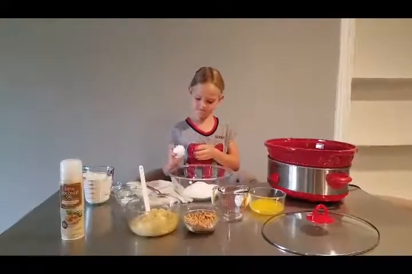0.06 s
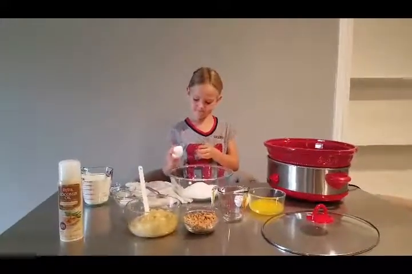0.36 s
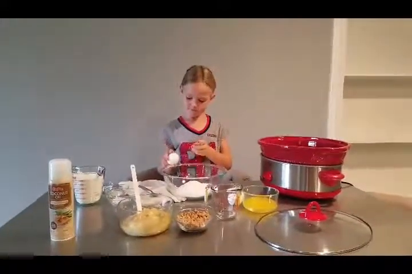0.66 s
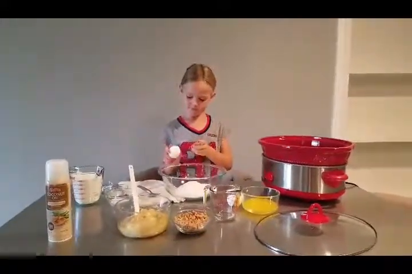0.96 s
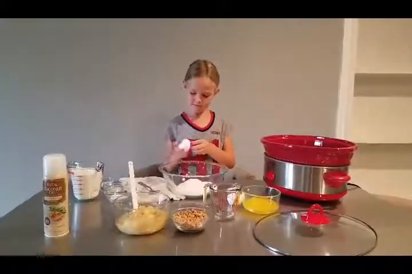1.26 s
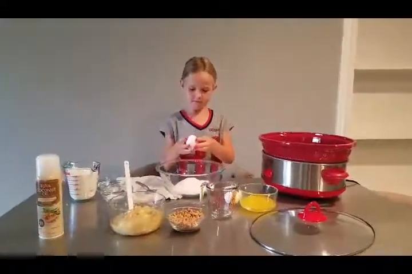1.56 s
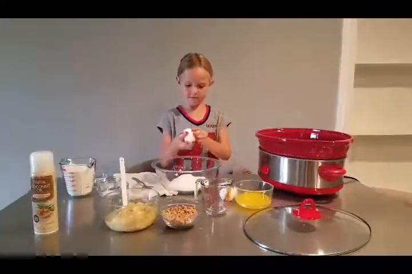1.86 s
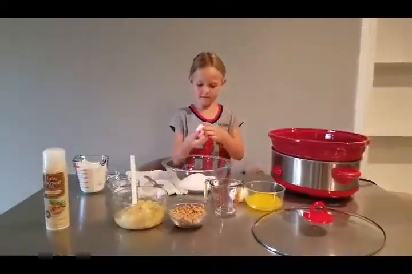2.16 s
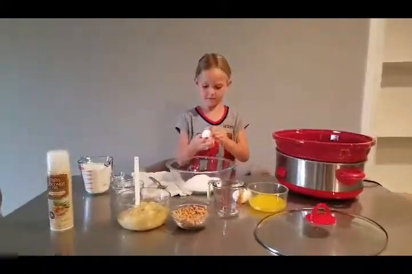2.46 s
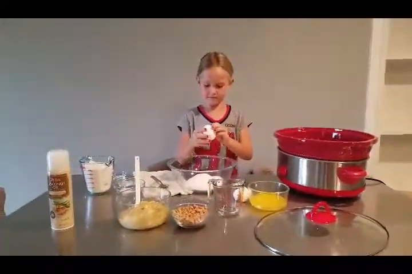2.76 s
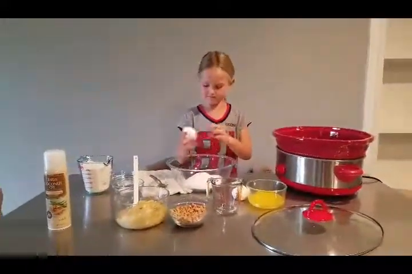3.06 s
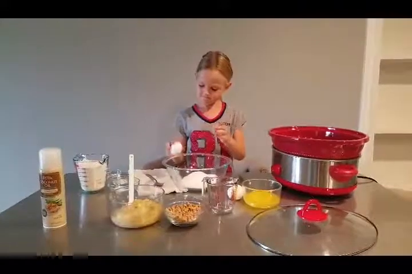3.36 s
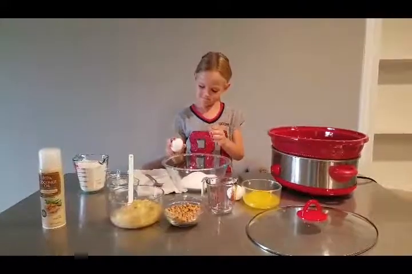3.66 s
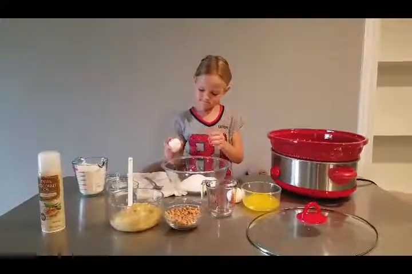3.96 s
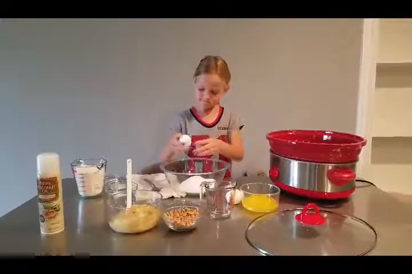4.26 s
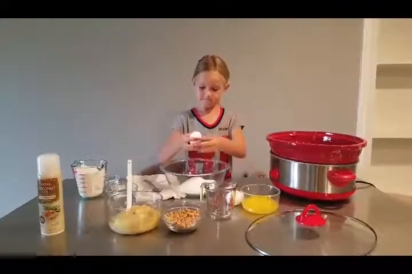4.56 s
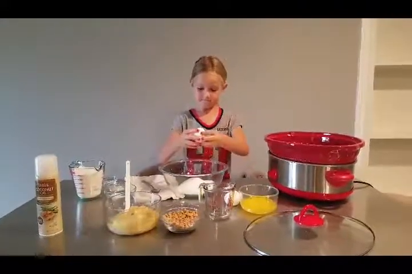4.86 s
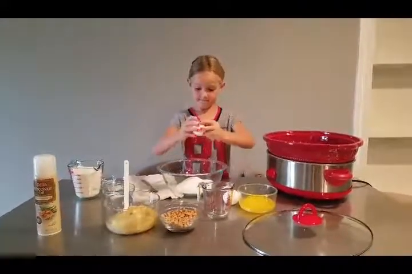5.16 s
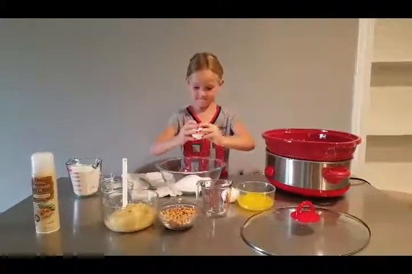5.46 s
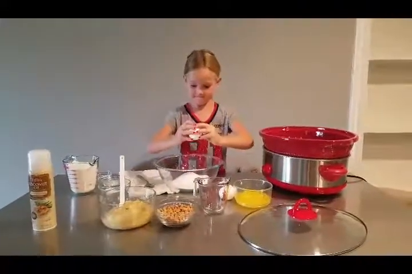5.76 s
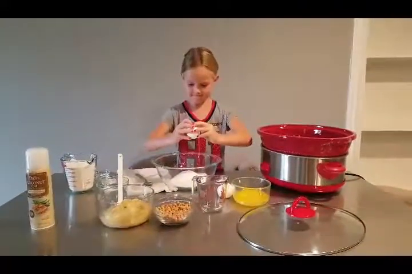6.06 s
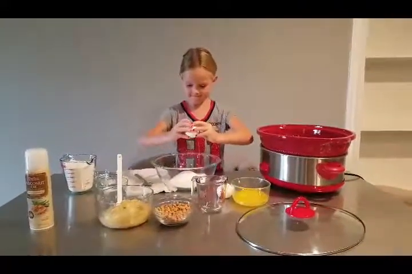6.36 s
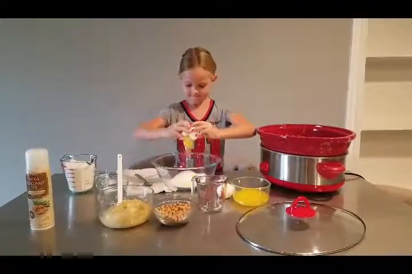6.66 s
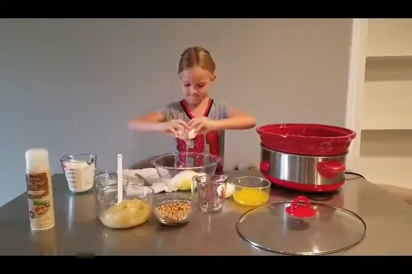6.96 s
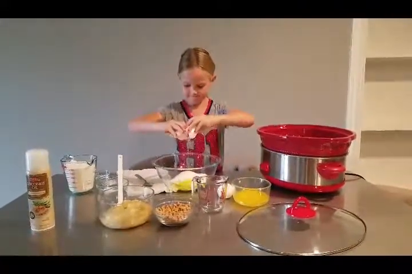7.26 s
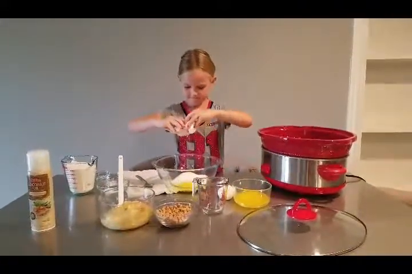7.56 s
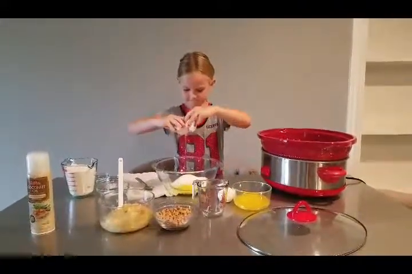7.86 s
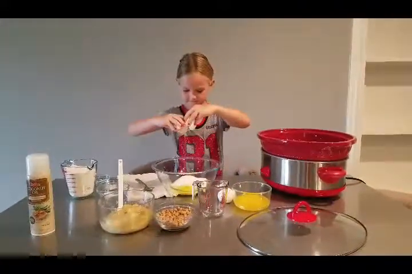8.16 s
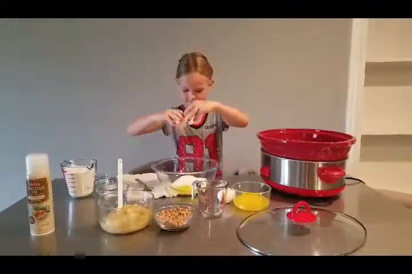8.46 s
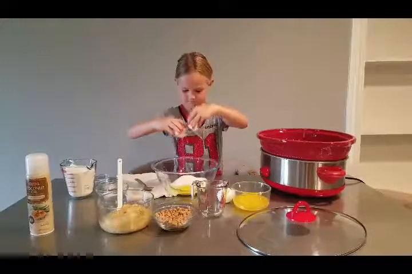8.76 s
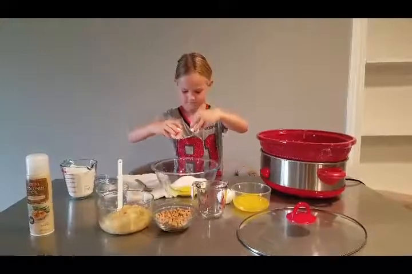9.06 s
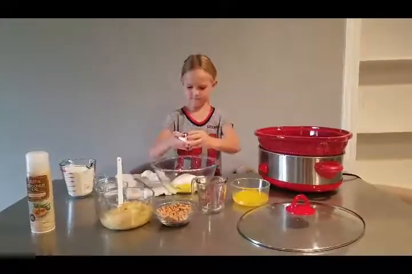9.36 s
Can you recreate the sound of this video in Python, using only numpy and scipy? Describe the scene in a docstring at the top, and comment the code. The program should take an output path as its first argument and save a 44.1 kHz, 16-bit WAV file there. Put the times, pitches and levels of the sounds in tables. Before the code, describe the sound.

In a quiet, slightly echoing room with a low appliance hum, an egg knocks against a glass bowl three times, then twice more, each tap leaving a short ring. Close handling clicks and rubs on the microphone come in between. Small ticks build into brittle snapping as the eggshell is pulled open, the contents plop softly, and the emptied halves crackle lightly as they are shaken.

```python
"""An appliance hums in a bare, quiet room; fingers click and slide on a hand-held camera.
An egg is tapped on the rim of a glass bowl, three times, then twice more: the shell cracks, the glass rings.
Thumbs press into the dent and the shell splits with a run of snaps.
The egg drops out with a plop; the wet, hollow halves are worked and shaken."""
import sys
import numpy as np
from scipy import signal
from scipy.fft import rfft, irfft
from scipy.io import wavfile

SR = 44100
rng = np.random.default_rng(int(sys.argv[2]) if len(sys.argv) > 2 else 0)


def inscribe(sig):
    """Save sig as 16-bit PCM at rate SR to the path in sys.argv[1].

    A 1-D sig is mono; a 2-D sig holds one channel per row.
    Samples are clipped to [-1, 1] before scaling.
    """
    pcm = np.round(np.clip(np.atleast_2d(sig).T, -1, 1) * 32767)
    wavfile.write(sys.argv[1], SR, pcm.astype(np.int16))


N = 414981

# egg on the rim: start_s, crack_db, treble_db, knock_db, knock_hz, crush_db
TAPS = [(0.5066, -29.5, -36, -31, 810, -31.5), (0.719, -33, -41.5, -39.5, 540, -70),
        (0.9175, -32.5, -37.5, -35.5, 740, -72), (3.3775, -31, -32, -34.5, 513, -36),
        (3.583, -40, -38.5, -42, 640, -65)]
# spectra of the shell's body and of a running crack: freq_hz, gain_db
SHELL = [(100, -29), (450, -23), (900, -17), (1450, -5), (2000, -5), (2800, 0), (3400, -0.5), (4100, -3),
         (5100, -3), (7000, -7), (9000, -15.5), (14000, -45)]
SPLINTER = [(2000, -32.5), (5500, -3.5), (7500, -1), (9500, -7.5), (11500, -2), (14400, 1), (16000, -5.5)]
# thumb squeezes: start_s, length_s, crumble_db, chip_db
SQUEEZES = [(5.469, 0.1, -64.5, -54), (6.21, .16, -67, -61), (6.378, 0.19, -53.5, -48.5),
            (6.59, .21, -59, -60), (6.947, 0.1, -58, -62), (7.313, 0.11, -72, -61),
            (7.608, 0.25, -66.5, -61.5), (8.499, 0.086, -56.5, -56), (8.681, 0.16, -62, -61.5)]
SPLIT_S, SPLIT_LENGTH_S = 6.41, 0.061


def amp(db):
    """Decibels to gain."""
    return 10 ** (np.asarray(db) / 20)


def unit(x):
    """Scale to rms 1."""
    return x / np.sqrt(np.mean(x ** 2) + 1e-20)


def read(points, hz):
    """Interpolate a table over log frequency."""
    freq_hz, value = np.transpose(points)
    return np.interp(np.log(hz + 1), np.log(freq_hz), value)


def add(mix, start_s, sound):
    """Mix a sound in at start_s."""
    part = mix[:, round(start_s * SR):][:, :sound.shape[-1]]
    part += sound[:, :part.shape[1]]


def pan(left_db):
    """Stereo gains for a left-over-right level."""
    return amp([[left_db / 2], [-left_db / 2]])


def sized(click, level_db, window_s=.004):
    """Give a click the energy of level_db held for window_s."""
    return amp(level_db) * unit(click) * np.sqrt(window_s * SR / click.shape[1])


def arches(strokes, peak_share, exponent):
    """Envelope: each stroke swells and lets go."""
    gain = np.zeros((1, N))
    for start_s, length_s, level_db, *_ in strokes:
        progress = np.linspace(0, 1, round(length_s * SR))
        skewed = np.interp(progress, [0, peak_share, 1], [0, .5, 1])
        add(gain, start_s, amp(level_db) * abs(np.sin(np.pi * skewed[None])) ** exponent)
    return gain


def colour(x, spectrum, peak_hz=1000, peak_db=0, width_share=.2, size=2048):
    """Minimum-phase filter: a spectrum plus one resonance."""
    hz = np.fft.rfftfreq(size, 1 / SR)
    gain_db = read(spectrum, hz) + peak_db / (1 + ((hz / peak_hz - 1) / width_share) ** 2)
    cepstrum = irfft(np.log(amp(gain_db)))
    cepstrum[1:size // 2] *= 2
    cepstrum[size // 2 + 1:] = 0
    impulse = irfft(np.exp(rfft(cepstrum)))
    return signal.fftconvolve(x, impulse[None], axes=1)[:, :x.shape[1]]


def noise_pair(spectrum, correlation, size):
    """Coloured stereo noise, left-right correlation set by frequency."""
    hz = np.fft.rfftfreq(size, 1 / SR)
    left, other = rfft(rng.standard_normal((2, size)))
    same = read(correlation, hz)
    right = same * left + np.sqrt(1 - same ** 2) * other
    return irfft(np.array([left, right]) * amp(read(spectrum, hz)), size)


def grains(rate_per_s, spread_db, size):
    """Sparse tiny clicks of uneven size."""
    heights = amp(spread_db * np.minimum(rng.exponential(1, size), 3)) * rng.choice([-1, 1], size)
    return unit(heights * (rng.random(size) < rate_per_s / SR))


def burst(decay_s, ragged, stereo, size=2048):
    """A sudden release, then fast-dying chatter."""
    t = np.arange(size) / SR
    noise = rng.standard_normal(size) + stereo * rng.standard_normal((2, size))
    chatter = unit(noise * np.exp(-t / decay_s)) / np.sqrt(size)
    return (t == 0) + ragged * chatter


def background(air_db=-67):
    """Still air and a steady appliance hum."""
    # hum partials: pitch_hz, level_db
    partials = [(74, -86), (90, -76), (101, -86.5), (116, -90), (127, -88.5), (139.5, -80.5), (187, -85.5),
                (278, -86), (545, -109.5)]
    # air noise: freq_hz, gain_db
    air = [(20, 2), (60, -7.5), (120, -1), (240, -5), (350, -1), (550, -2.5), (900, -6.5), (1800, -7.5),
           (4000, -13.5), (7000, -17.5), (9500, -19), (13900, -13), (16000, -30)]
    # left-right likeness: freq_hz, correlation
    air_likeness = [(60, 0.66), (180, 0.46), (550, 0.073), (1650, 0.06), (4970, 0.017), (15000, 0.02)]
    t, knots_s = np.arange(N) / SR, np.linspace(0, N / SR, num=30)
    hum = np.zeros(N)
    for pitch_hz, level_db in partials:
        drift_rad = .5 * np.interp(t, knots_s, rng.standard_normal(len(knots_s)))
        hum += amp(level_db) * np.sqrt(2) * np.sin(2 * np.pi * (pitch_hz * t + rng.random()) + drift_rad)
    return amp(air_db) * unit(noise_pair(air, air_likeness, N)) + hum


def handling():
    """Fingers slide near the left port, click and bump; the camera's case carries the sound."""
    # finger touches: start_s, click_db, bump_db, left_db
    touches = [(0.158, -73, -58.5, 1), (.2122, -56, -69, 16), (0.3286, -55, -48, 35),
               (1.3457, -40.5, -69, 27), (1.501, -57, -40, 15), (2.0406, -83, -43.5, -16),
               (2.138, -43.5, -56, 25), (2.152, -44.5, -40, -15), (2.1579, -36.5, -36.5, 8),
               (3.81, -53.5, -60, 25), (9.069, -70, -60, -18), (9.2049, -62.5, -54.5, -26)]
    # finger slides: start_s, length_s, level_db
    slides = [(.322, 0.039, -66), (1.22, .22, -74), (1.4, 0.15, -63), (1.685, 0.14, -59.5),
              (1.825, 0.085, -62), (2.075, 0.048, -72), (2.135, 0.069, -66.5)]
    # spectra: freq_hz, gain_db
    skin = [(100, -29), (700, -11.5), (1300, -1.5), (2200, 0.5), (3200, -7.5), (4500, -14), (8000, -10.5),
            (9700, -25), (11500, -17.5), (15000, -17.5)]
    case_click = [(100, -24), (700, -13.5), (1300, 5.5), (2200, 6), (3200, 0), (4500, -14), (8000, -10.5),
                  (10000, -27), (15000, -13)]
    case_bump = [(30, -19), (120, -4.5), (400, 6), (800, -1.5), (1500, 2.5), (5000, -25.5)]
    rub = grains(5000, 0.55, N) + 0.35 * rng.standard_normal((2, N))
    out = arches(slides, peak_share=0.6, exponent=0.85) * unit(colour(rub, skin)) * pan(23.8)
    for start_s, click_db, bump_db, left_db in touches:
        click = colour(burst(decay_s=0.00017, ragged=0.99, stereo=1), case_click)
        bump = colour(burst(decay_s=0.0023, ragged=0.3, stereo=0.08), case_bump)
        add(out, start_s, unit(pan(left_db)) * (sized(click, click_db) + sized(bump, bump_db)))
    return out


def splinter(rise_s, decay_s, stereo, size=2048):
    """A crack runs through the shell: a brief fizz."""
    t = np.arange(size) / SR
    fizz = rng.standard_normal(size) + stereo * rng.standard_normal((2, size))
    return colour(fizz * (1 - np.exp(-t / rise_s)) * np.exp(-t / decay_s), SPLINTER)


def crumbs(rate_per_s, treble_db, size):
    """Many tiny breaks, each sounding the shell."""
    onsets = grains(rate_per_s, 1, size)[None]
    breaks = signal.fftconvolve(onsets, burst(decay_s=0.0014, ragged=0.6, stereo=1), axes=1)[:, :size]
    return unit(unit(colour(breaks, SHELL)) + amp(treble_db) * unit(colour(breaks, SPLINTER)))


def taps():
    """Each blow cracks the shell, knocks the bowl on the table and crushes a small dent."""
    out, t = np.zeros((2, N)), np.arange(SR // 5) / SR
    for start_s, crack_db, treble_db, knock_db, knock_hz, crush_db in TAPS:
        crack = colour(burst(decay_s=0.0042, ragged=1.86, stereo=1), SHELL)
        fizz = splinter(rise_s=0.0002, decay_s=0.0008, stereo=1.3)
        add(out, start_s, sized(crack, crack_db) + sized(fizz, treble_db))
        add(out, start_s, sized(knock(knock_hz), knock_db + 1.5))
        dent = crumbs(1700, treble_db - crack_db, len(t)) * np.exp(-t / 0.017)
        add(out, start_s, amp(crush_db) * dent)
    return out


def knock(pitch_hz):
    """The bowl on the table: a thud with one resonance."""
    # thud spectrum: freq_hz, gain_db
    thud = [(30, -28), (90, -9), (140, -12), (230, -17), (300, -7), (370, -8.5), (480, -3), (750, 3),
            (1100, -5), (2000, -22.5), (6000, -70)]
    blow = burst(decay_s=0.0024, ragged=0.92, stereo=0.08)
    return colour(blow, thud, peak_hz=pitch_hz, peak_db=9, width_share=.17)


def bowl(twin_lag_rad=1.45):
    """Twin glass modes beat as they die; the egg's next touch damps the ring."""
    # glass modes: pitch_hz, twin_offset_hz, twin_gain, t60_s, left_db
    modes = [(508, 9, .5, .5, -2), (1365, 9.8, 1, .56, -2), (2531, 15, .7, .41, 4), (3962, -12, .6, .29, 0),
             (5527, -22, .5, .27, -2), (7190, 20, .5, .24, 0), (10805, -25, .5, .19, 0),
             (13062, -20, .5, .17, 0)]
    # spot struck, per tap: mode1_db, mode2_db, mode3_db, mode4_db, mode5_db, higher_db
    spots = [(-67, -49.5, -30, -36, -51, -51), (-49.5, -33.5, -39, -35.5, -38, -58),
             (-50, -35, -32.5, -49, -74, -49), (-61, -27.5, -40.5, -42, -62, -56),
             (-58.5, -41.5, -48.5, -40, -48, -67)]
    # twin excitation, per tap: lowest_two_share, others_share
    twins = [(.3, .2), (.85, .3), (1, .25), (.12, .9), (.25, .6)]
    out, t = np.zeros((2, N)), np.arange(SR) / SR
    swell = 1 - .5 * np.exp(-t / 0.0033)
    starts_s = [tap[0] for tap in TAPS]
    nexts_s = starts_s[1:] + [np.inf]
    for start_s, next_s, mode_db, (low_share, high_share) in zip(starts_s, nexts_s, spots, twins):
        damping = np.where(start_s + t < next_s, 1, .6)
        for k, (pitch_hz, offset_hz, twin_gain, t60_s, left_db) in enumerate(modes):
            share = low_share if k < 2 else high_share
            twin = np.sin(2 * np.pi * (pitch_hz + offset_hz) * t - twin_lag_rad)
            pair = np.sin(2 * np.pi * pitch_hz * t) + share * twin_gain * twin
            envelope = swell * damping * np.exp(-np.log(1000) * t / t60_s)
            add(out, start_s, pan(left_db) * amp(mode_db[min(k, 5)]) * pair * envelope)
    return out


def room(x, size=32768):
    """Dense tail from bare walls; treble dies first."""
    # tail spectrum: freq_hz, gain_db
    walls = [(60, -0.5), (250, 5.5), (600, -3), (1400, 3), (3000, -1.5), (6000, -0.5), (10000, 3),
             (14500, 3)]
    # tail decay: freq_hz, t60_s
    decay = [(150, 0.77), (600, 0.52), (1500, 0.45), (4000, .46), (8000, 0.44), (14500, 0.3)]
    # left-right likeness: freq_hz, correlation
    likeness = [(100, 0.95), (500, 0.75), (1200, 0.29), (2500, 0), (15000, 0)]
    hz, frame_s, bands = signal.stft(noise_pair(walls, likeness, size), SR, nperseg=256)
    fade = np.exp(-np.log(1000) * frame_s / read(decay, hz)[:, None])
    tail = signal.istft(bands * fade, SR, nperseg=256)[1]
    t = np.arange(tail.shape[1]) / SR
    tail *= np.clip(t / 0.0026, 0, 1) * (1 + 1.68 * np.exp(-t / 0.0042))  # table and near wall first
    return signal.fftconvolve(x, tail / np.linalg.norm(tail[0]), axes=1)[:, :N]


def opened(time_s):
    """How far the shell has parted, 0-1."""
    return np.clip((time_s - SPLIT_S) / SPLIT_LENGTH_S + .5, 0, 1)


def snap(start_s, level_db, pitch_hz, treble_db):
    """A fragment rings, the crack fizzes, the egg pops along: faintly once split."""
    release = burst(decay_s=0.0014, ragged=2, stereo=0.86)
    fragment = colour(release, SHELL, peak_hz=pitch_hz, peak_db=11, width_share=.18)
    fizz = splinter(rise_s=0.00028, decay_s=0.001, stereo=1.9)
    pop_db = level_db - 12 - 25 * opened(start_s)
    return sized(fragment, level_db) + sized(fizz, level_db + treble_db) + pop(pop_db)


def pop(level_db):
    """Dull, wet sound of the egg's contents."""
    # pop spectrum: freq_hz, gain_db
    contents = [(40, -23), (200, -28), (400, 1), (600, 8), (850, 2), (1500, -19.5), (5000, -87)]
    return sized(colour(burst(decay_s=0.0065, ragged=0.77, stereo=0.2), contents), level_db)


def chips(count=12, gap_s=0.027, centre_hz=3900, spread_octaves=0.49):
    """Small chips break off at random while a squeeze lasts."""
    out = np.zeros((2, N))
    for start_s, length_s, _, chip_db in SQUEEZES:
        times_s = start_s + gap_s * (np.arange(count) + rng.random(count))
        for time_s, (scatter_db, detune) in zip(times_s, rng.standard_normal((count, 2))):
            pitch_hz = centre_hz * 2 ** (spread_octaves * detune)
            chip = snap(time_s, chip_db - scatter_db, pitch_hz, treble_db=1)
            add(out, time_s, chip * (time_s < start_s + length_s))
    return out


def shell(lead_s=.008):
    """The shell crumbles under the thumbs, snaps and sheds crumbs; the contents plop."""
    # clear snaps: start_s, level_db, pitch_hz, treble_db
    snaps = [(2.465, -58, 6230, -4), (4.9008, -60, 5740, -10), (5.1705, -69, 4930, 10.5),
             (5.3062, -62.5, 6760, 4), (5.326, -51.5, 4930, -0.5), (5.388, -48, 7000, 1.5),
             (5.4353, -54, 6340, 5), (5.4775, -49.5, 6100, 1.5), (5.5676, -52, 5600, 11),
             (5.585, -54, 5300, -1), (5.627, -67, 5250, 12), (5.7266, -47, 5600, 7),
             (5.793, -61.5, 5730, 0), (6.076, -62, 5440, -3), (6.1638, -60, 5670, 5),
             (6.2358, -45.5, 3420, 4.5), (6.313, -64.5, 5600, 12.5), (6.3827, -58, 2970, 11),
             (6.395, -46, 6150, 11), (6.423, -36.5, 5150, 3.5), (6.4309, -32, 3350, -5),
             (6.443, -34.5, 1980, 3.5), (6.4793, -38.5, 2520, -2), (6.532, -36, 2280, -1.5),
             (6.567, -41.5, 5100, 4), (6.6128, -36, 1390, 0.5), (6.673, -33.5, 3360, -7),
             (6.7608, -40, 3520, 0), (6.8, -48, 3560, -1), (6.913, -53.5, 5200, -9), (6.9538, -44, 2900, 9),
             (6.958, -37.5, 3900, 3), (7.0283, -41, 3070, -17), (7.3515, -41.5, 5460, 1),
             (7.383, -39.5, 2880, -2), (7.6524, -46.5, 2770, -5), (7.695, -49.5, 2900, 8),
             (7.8117, -54, 7000, 2), (7.832, -54, 2790, -11), (7.9703, -47.5, 2950, -13),
             (8.1658, -57.5, 3460, 3.5), (8.4923, -56.5, 3750, 3.5), (8.5388, -45, 4760, 0),
             (8.7973, -55, 2460, 3.5), (9.368, -53.5, 5900, -12)]
    # thumbs break in, egg drops, last blob of white follows: start_s, level_db
    plops = [(5.387, -49.5), (6.955, -54), (7.383, -56)]
    crumbling = arches(SQUEEZES, peak_share=0.34, exponent=1) * crumbs(450, -5.5, N)
    out = crumbling + chips()
    t = np.arange(2048)[None] / SR
    flurry = np.exp(-abs(t - lead_s) / 0.0026)  # tiny breaks before and after a snap
    shedding = np.zeros((1, N))
    for start_s, level_db, pitch_hz, treble_db in snaps:
        add(out, start_s, snap(start_s, level_db, pitch_hz, treble_db))
        add(shedding, start_s - lead_s, amp(level_db) * flurry)
    out += amp(-7.5) * shedding * crumbs(3300, -7, N)
    for start_s, level_db in plops:
        add(out, start_s, pop(level_db))
    return out


def hollow(x, start_hz=1800, end_hz=1420, sink_s=0.1, width_hz=140, fade_db_per_s=7.5):
    """Air in the parted halves resonates, sinking and fading as they empty."""
    t = np.arange(N) / SR
    since_s = np.maximum(t - SPLIT_S, 0)
    pitch_hz = end_hz + (start_hz - end_hz) * np.exp(-since_s / sink_s)
    drive = x * opened(t) * amp(5 - fade_db_per_s * since_s)
    # gliding resonance: shift to 0 Hz, low-pass, shift back
    carrier = np.exp(2j * np.pi * np.cumsum(pitch_hz) / SR)
    pole = np.exp(-np.pi * width_hz / SR)
    baseband = signal.lfilter([1 - pole], [1, -pole], drive / carrier + 1e-18)
    return 2 * (carrier * baseband).real


def scene():
    """Egg and bowl sound in the room; the handling stays dry."""
    blows, ring, breaking = taps(), bowl(), shell()
    egg = breaking + hollow(breaking)
    reverb = room(amp(5) * blows + amp(-15) * ring + amp(-0.6) * egg)
    return blows + ring + egg + reverb + handling() + background()


def record(dry, edge_hz=16450):
    """Top-treble roll-off, then the band limit."""
    # microphone response: freq_hz, gain_db
    microphone = [(20, -2), (14400, -2), (14900, -15), (16300, -33)]
    hz = np.fft.rfftfreq(N, 1 / SR)
    heard = irfft(rfft(dry) * amp(read(microphone, hz)), N)
    band_limit = signal.firwin(511, edge_hz, window=("kaiser", 9), fs=SR)
    return signal.oaconvolve(heard, band_limit[None], "same")


dry = scene()
out = record(dry)
inscribe(out)
```